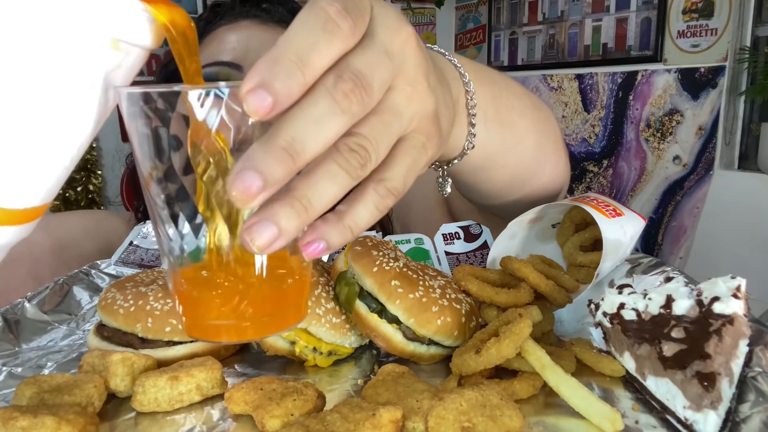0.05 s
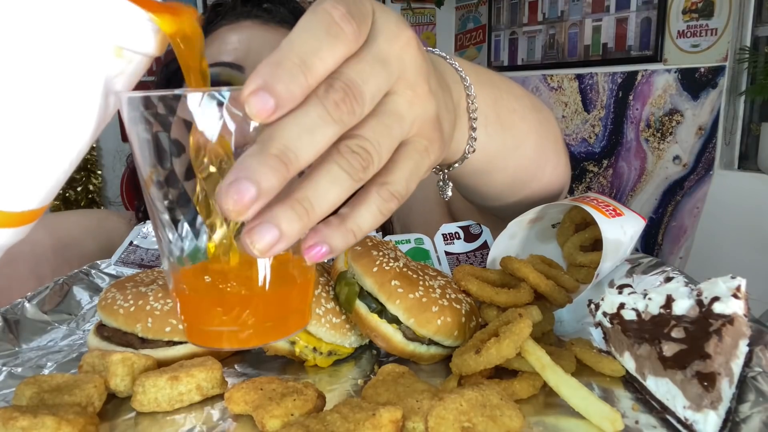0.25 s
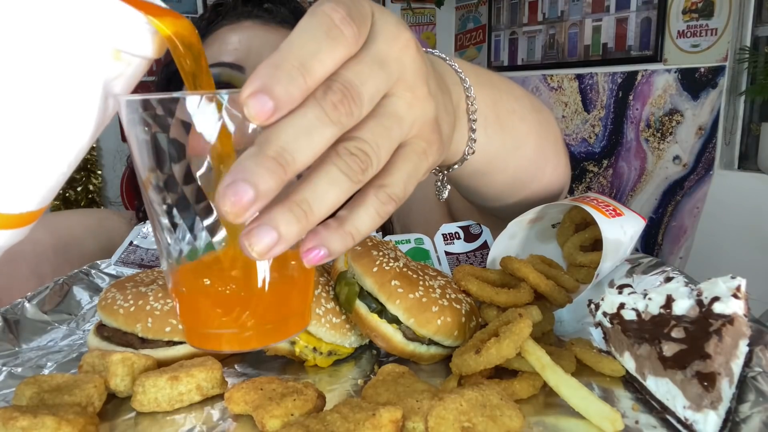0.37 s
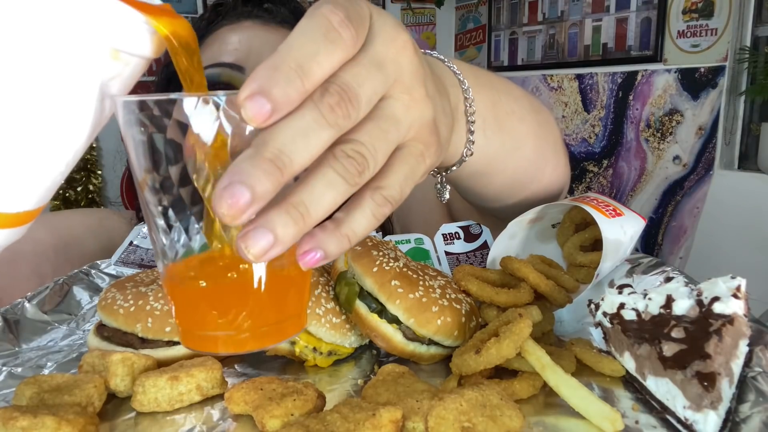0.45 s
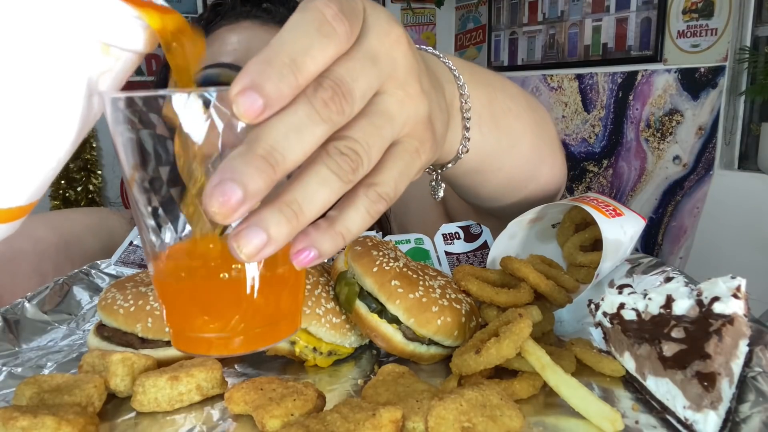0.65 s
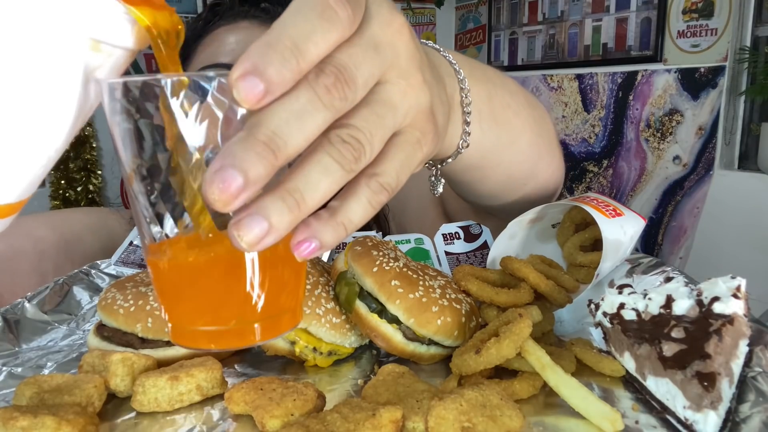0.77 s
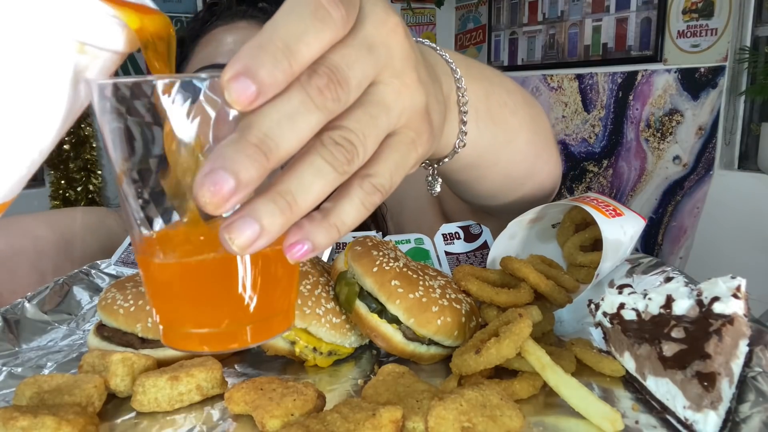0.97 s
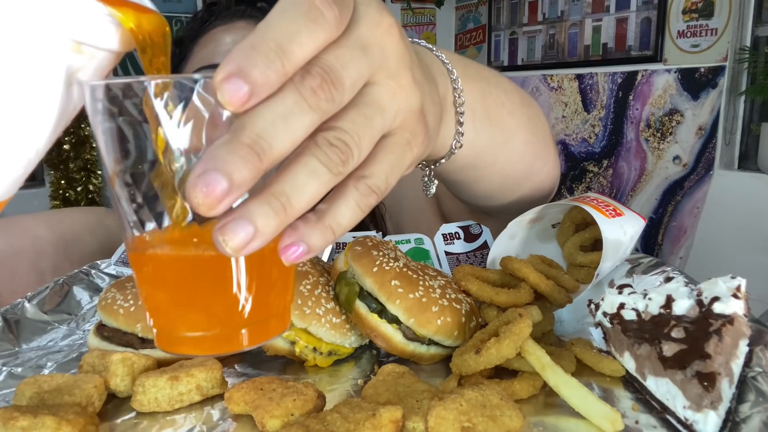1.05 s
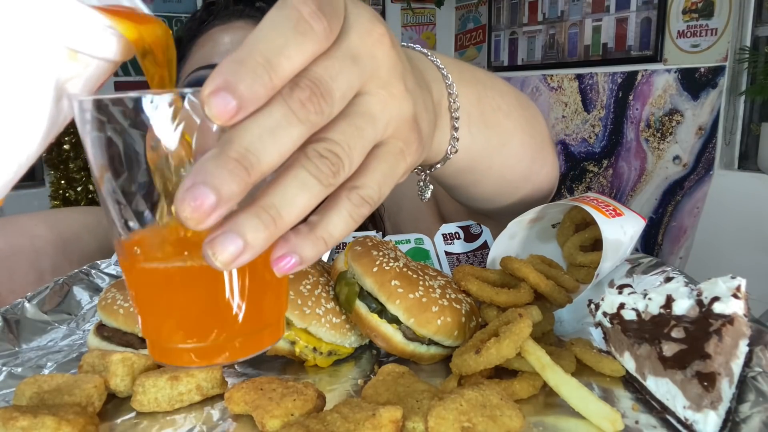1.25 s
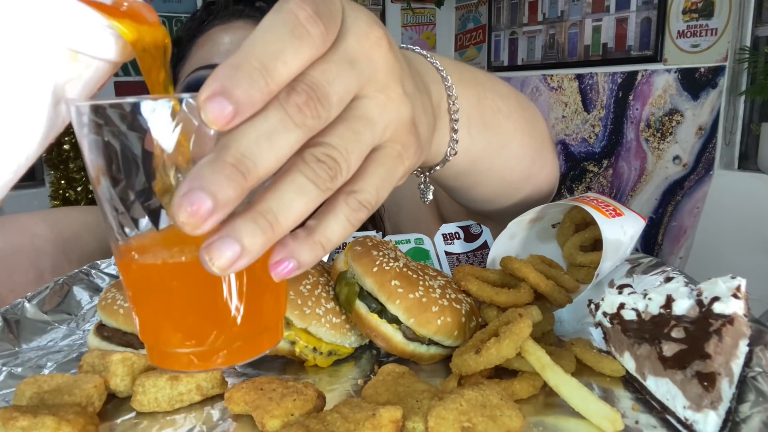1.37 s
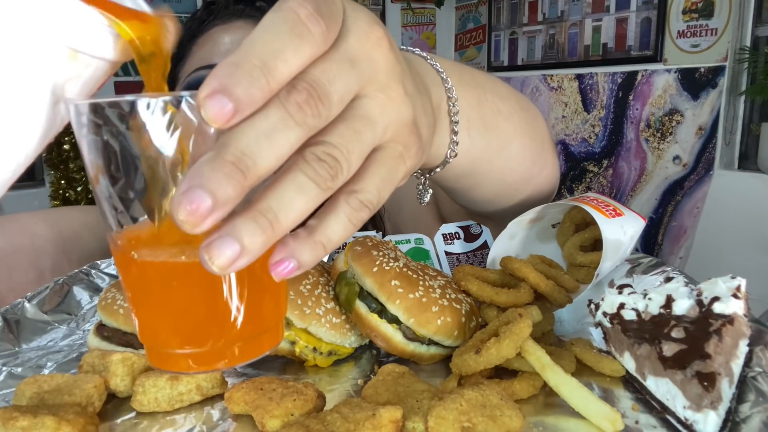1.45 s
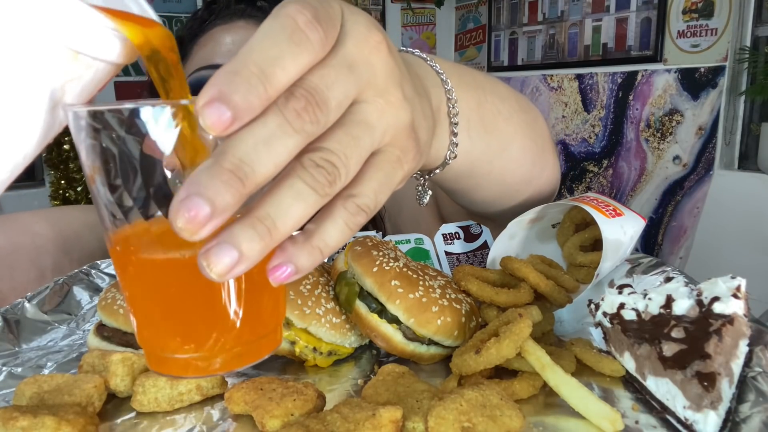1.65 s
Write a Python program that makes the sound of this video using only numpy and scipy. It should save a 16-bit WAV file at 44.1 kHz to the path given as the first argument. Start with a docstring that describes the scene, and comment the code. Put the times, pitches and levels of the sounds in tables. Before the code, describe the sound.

Close crackly fizz of a soft drink being poured into a plastic cup in a room

```python
"""A fizzy drink is poured into a plastic cup close to a phone on a table indoors.
From the start froth cracks in short bright noise pops, treble first, over a fizz of countless tiny grains.
Larger bubbles plop as rising sines; the loudest bursts of pops come near 0.3, 0.7 and 1.3 s.
Resonators ring as the air in the cup, the highest note growing later on; sparse echoes add a short tail.
A wavering hum and faint low noise rumble throughout, and the fizz sinks away at the end."""
import sys
import numpy as np
from scipy import signal
from scipy.fft import rfft, irfft, next_fast_len
from scipy.io import wavfile
from scipy.ndimage import uniform_filter1d

SR = 44100
rng = np.random.default_rng(int(sys.argv[2]) if len(sys.argv) > 2 else 0)


def transcribe(signal):
    """Save signal, clipped to [-1, 1], as a 16-bit WAV file at the path in sys.argv[1]."""
    frames = np.atleast_2d(signal).T
    limited = np.clip(frames, -1, 1)
    pcm = np.round(limited * 32767).astype(np.int16)
    wavfile.write(sys.argv[1], SR, pcm)


def boost_factor(decibels):
    """Convert a level in decibels to a linear amplitude factor."""
    exponent = np.asarray(decibels, float) / 20
    return 10 ** exponent


N = 74970  # length [samples]


def evened(x):
    """Scales a signal to an rms of 1."""
    return x / np.sqrt(np.mean(x ** 2) + 1e-20)


def smoothed(x, size):
    """Averages twice over a sliding window, leaving only slow movement."""
    return uniform_filter1d(uniform_filter1d(x, size=size), size=size)


def read(points, hz):
    """Reads a curve over frequency, interpolating along log frequency."""
    f, value = np.transpose(points)
    return np.interp(np.log(hz + 1), np.log(f + 1), value)


def along(points):
    """Draws a curve over time, one value per sample."""
    t, value = np.transpose(points)
    return np.interp(np.arange(N) / SR, t, value)


def add(mix, start_s, sound):
    """Lays a sound into the mix, cut at the end of the mix."""
    part = mix[round(start_s * SR):][:len(sound)]
    part += sound[:len(part)]


def shaped(x, gain):
    """Filters x by a function of frequency."""
    size = next_fast_len(x.shape[-1] + 4096)
    spectrum = rfft(x, size) * gain(np.fft.rfftfreq(size, 1 / SR))
    return irfft(spectrum, size)[..., :x.shape[-1]]


def pop(db, centre_hz, low_db, high_db, noise):
    """Crackle from a cluster of bubbles with its own lumpy colour; treble arrives first, lows trail."""
    # Colour that the microphone gives the pops: (frequency [Hz], gain [dB])
    mic_colour = [(250, -37), (700, -1.5), (1100, 0), (7500, 1), (9500, 7.5), (11500, 1), (14000, -6.5),
                  (16500, -28)]
    rise_s, hold_s, sag_db = 0.001, 0.0041, -6  # the sag is reached at the end of the hold and runs on
    extra_t60_s = 0.033  # after the hold, this decay joins the sag
    hump_width_oct, low_hz, high_hz, skirt_db = 0.4, 2190, 9270, -4
    lumps_db, treble_lead_s = 2 + 1, 0.0003  # lead per octave
    trim_db = -6.5
    t = np.arange(noise.shape[1]) / SR
    late = np.maximum(t - hold_s, 0)
    envelope = np.minimum(t / rise_s, 1) * boost_factor(sag_db * t / hold_s - 60 * late / extra_t60_s)
    lumps = lumps_db * evened(smoothed(noise[1], 24))

    def colour(hz):
        """A hump on a skirt between low and high sides, with a delay that grows downwards."""
        octaves = np.log2(hz + 1)
        hump = np.exp(-.5 * ((octaves - np.log2(centre_hz)) / hump_width_oct) ** 2)
        low = 1 / (1 + (hz / low_hz) ** 6)
        high = 1 / (1 + (high_hz / (hz + 1)) ** 8)
        middle = (1 - low) * (1 - high) * (hump + boost_factor(skirt_db))
        body = middle + low * boost_factor(low_db) + high * boost_factor(high_db)
        lumpy = boost_factor(read(mic_colour, hz) + np.interp(hz, np.linspace(0, SR / 2, len(t)), lumps))
        delay_s = treble_lead_s * np.clip(np.log2(SR / 2) - octaves, 0, 6)
        phase = 2 * np.pi * np.cumsum(delay_s) * hz[1]  # delay summed over frequency; hz[1] is the bin width
        return body * lumpy * np.exp(-1j * phase)

    sound = shaped(envelope * noise[0], colour)
    loudest = np.sqrt(uniform_filter1d(sound ** 2, size=130).max())  # rms of the loudest 3 ms
    return boost_factor(db + trim_db) * sound / loudest


def froth(drink):
    """Adds the cracks of the froth, each pop from fresh noise."""
    # Cracks of the froth: (time [s], level before the common trim [dB], centre [Hz],
    # low side [dB], high side [dB])
    cracks = [(0.0034, -22, 6800, -23, -5.5), (0.0646, -29, 3230, -17.5, -9),
              (0.078, -25.5, 7800, -15, -13), (0.0989, -21, 3280, -6.5, -15), (0.114, -41, 4800, -10, -23),
              (0.1368, -21.5, 2560, -9, -23), (0.182, -26, 3420, -35, -40), (0.2188, -33.5, 5000, -20, -10),
              (0.229, -17.5, 6700, -26, -4), (0.2437, -15.5, 6200, -11, -7.5),
              (0.2668, -18, 3360, -9.5, -36), (0.3014, -7, 8400, -12, -6), (0.3064, -6.5, 4500, -9.5, -33),
              (0.3325, -14.5, 4900, 10, -0.5), (0.3452, -18, 3520, -4.5, -12),
              (0.409, -19, 7200, -21, -4.5), (0.4416, -13.5, 3860, -12, -9), (0.4701, -19, 3350, -14, -41),
              (0.5438, -22.5, 3760, -45, -56), (0.5949, -22.5, 3280, 0, -9), (0.614, -21, 3800, -32, -15),
              (0.6651, -24.5, 3010, 28.5, 27.5), (0.698, -7.5, 3000, -7.5, -10),
              (0.7156, -20.5, 2580, 14, -8), (0.746, -28, 3150, -5, -12), (0.7764, -23.5, 7200, -6, -37),
              (0.7857, -23.5, 3670, 4, -16), (0.8021, -20.5, 3260, -4.5, -44), (0.846, -13, 3700, -4.5, -5),
              (0.8855, -24.5, 4220, 9.5, -15), (0.9207, -30.5, 3200, -7, -16),
              (0.9463, -26.5, 3270, -2, -33), (0.9516, -22.5, 3050, 17, -1), (0.9627, -23.5, 3220, 1, -4),
              (0.979, -31.5, 3400, -30, -41), (0.997, -17.5, 7700, -30, -5),
              (1.002, -20.5, 3800, -6.5, -40), (1.026, -22, 3240, -37, -17), (1.046, -32.5, 3840, -9, -10),
              (1.1012, -29, 3265, -7, -23), (1.1277, -21, 6300, -1.5, -0.5),
              (1.2031, -28.5, 2870, 11.5, -17), (1.2295, -26.5, 3205, -21, -19),
              (1.243, -34.5, 3100, -4, -27), (1.256, -32.5, 3050, -20, -35), (1.3092, -10, 5470, -20, -4.5),
              (1.3545, -23, 4780, 0, -21), (1.3618, -31, 3100, 10, -26), (1.379, -18, 7100, -2.5, -4),
              (1.398, -20.5, 3070, 11, -12), (1.4218, -21, 6700, -14, -17), (1.474, -31, 3180, 6, -11),
              (1.5079, -23.5, 2870, -6, -11.5), (1.5763, -27, 2800, 10, -17), (1.5991, -28, 3050, 4.5, -51),
              (1.61, -25.5, 2950, 4.5, -49), (1.649, -39, 2000, 23, -35), (1.6954, -33.5, 2884, -2, -44)]
    for (start_s, *row), noise in zip(cracks, rng.standard_normal((len(cracks), 2, 1500))):
        add(drink, start_s, pop(*row, noise))


def plop(db, hz, noise):
    """One bubble: a dying, wobbling sine that glides up; low bubbles ring longer."""
    # Bubbles near the cup's low notes ring longer: (frequency [Hz], extra T60 [s])
    long_notes = [(888, .18), (1045, .07)]
    long_width_hz, floor_t60_s, ring_cycles = 22, 0.023, 10.5
    rise_s, wobble_db, trim_db = 0.0016, 1.5, 2
    glide = 0.109  # share by which the pitch rises over the T60
    t = np.arange(len(noise)) / SR
    t60_s = floor_t60_s + ring_cycles / hz
    for note_hz, extra_s in long_notes:
        t60_s += extra_s * np.exp(-((hz - note_hz) / long_width_hz) ** 2)
    wave = np.sin(2 * np.pi * hz * (t + .5 * glide * t ** 2 / t60_s))
    wobble = wobble_db * evened(smoothed(noise, 60))
    return boost_factor(db + trim_db - 60 * t / t60_s + wobble) * (1 - np.exp(-t / rise_s)) * wave


def large_bubbles(drink):
    """Adds the plops of the larger bubbles, each with its own wobble."""
    # Plopping bubbles: (time [s], level before the common trim [dB], starting pitch [Hz])
    bubbles = [(0.1, -37, 1066), (0.3031, -12, 1480), (0.3074, -10.5, 1968), (0.309, -14.5, 3004),
               (0.322, -28.5, 918.6), (0.333, -18, 1660), (0.3345, -17, 1914), (0.357, -30.5, 656),
               (0.5752, -32, 1800), (0.571, -32, 1016), (0.596, -30.5, 1540), (0.616, -33, 635),
               (0.666, -36.5, 1050), (0.6997, -15.5, 1648), (0.702, -17, 1064), (0.717, -40, 1013),
               (0.786, -36, 1030), (0.829, -33, 930), (0.894, -25, 1008), (0.916, -23.5, 966),
               (0.917, -30.5, 585), (0.955, -26, 1390), (0.963, -32, 511), (0.9988, -33, 1730),
               (1.1704, -31.5, 1180), (1.17, -42, 895), (1.176, -33, 1463), (1.3091, -26.5, 2087),
               (1.355, -40.5, 899), (1.3976, -29.5, 874), (1.3992, -26, 1900), (1.519, -34, 1500),
               (1.528, -30.5, 511), (1.611, -34, 1138)]
    for (start_s, *row), noise in zip(bubbles, rng.standard_normal((len(bubbles), 7000))):
        add(drink, start_s, plop(*row, noise))


def fizz():
    """Thousands of tiny bubbles of uneven size, each a few cycles at its own pitch, swelling in flurries."""
    # Loudness of the fizz before the cup: (time [s], level [dB])
    fizz_level = [(0, -44), (.2, -54.5), (.8, -45), (1.2, -53.5), (1.5, -48.5), (1.7, -61.5)]
    # Balance of the fizz over pitch: (frequency [Hz], relative level [dB])
    fizz_colour = [(300, -44), (900, 11), (2520, 0.5), (4600, 3), (7600, 1.5), (9390, -18), (11100, -20.5)]
    bubbles_per_s, spread_db, grain_cycles = 6000, 3.2, 4.5
    flurries_per_s, flurry_db, flurry_t60_s = 90, 7, .025
    sizes = boost_factor(spread_db * np.minimum(rng.exponential(1, N), 4))
    hits = (rng.random(N) < bubbles_per_s / SR) * sizes
    starts = (rng.random(N) < flurries_per_s / SR) * rng.random(N) * boost_factor(flurry_db)
    hits *= 1 + signal.lfilter([1], [1, -boost_factor(-60 / flurry_t60_s / SR)], starts)
    pitches = np.geomspace(500, 15000, num=30)
    kind = rng.integers(0, len(pitches), N)
    out = np.zeros(N)
    for k, hz in enumerate(pitches):
        cycles = np.arange(0, 5 * grain_cycles, hz / SR)
        grain = cycles * np.exp(-2 * cycles / grain_cycles) * np.sin(2 * np.pi * cycles)
        grain /= np.linalg.norm(grain)
        out += boost_factor(read(fizz_colour, hz)) * np.sqrt(hz) * signal.oaconvolve(hits * (kind == k), grain)[:N]
    return boost_factor(along(fizz_level)) * evened(out)


def cup(x):
    """The air column rings along with everything in the cup: resonators added to the direct sound."""
    # Notes of the air, lowest first: (frequency [Hz], width [Hz], level [dB]); the last also follows top_level
    notes = [(902, 13, -23.5), (1050, 20, -6), (3061, 208, 2.5)]
    # The highest note grows as the cup fills, after an early dip: (time [s], added level [dB])
    top_level = [(0, 0.5), (.3, -4), (1.7, 5.5)]
    *low, top = [boost_factor(db) * signal.lfilter(*signal.iirpeak(hz, hz / width_hz, SR), x)
                 for hz, width_hz, db in notes]
    return x + sum(low) + boost_factor(along(top_level)) * top


def tail(x):
    """Sparse reflections of random sign, each band dying at its own speed; one tail shared, one per side."""
    # Decay of table and walls: (frequency [Hz], T60 [s])
    decay = [(400, 0.32), (1000, 0.23), (3500, .2), (12000, 0.17)]
    tail_db = -8
    taps = np.zeros((3, SR // 2))
    grid = np.arange(160, SR // 2 - 20, 16)
    at = grid + rng.integers(0, 16, (3, (SR // 2 - 165) // 16))
    np.put_along_axis(taps, at, rng.choice([-1., 1.], at.shape), 1)
    hz, t, z = signal.stft(taps, SR, nperseg=128)
    fading = z * boost_factor(-60 * t / read(decay, hz)[:, None])
    taps = signal.istft(fading, SR, nperseg=128)[1]
    return boost_factor(tail_db) * signal.fftconvolve(x[None], taps / np.linalg.norm(taps[0]), axes=1)[:, :N]


def rumble():
    """A hum of wavering phase, nearly alike on both sides, and faint low noise that they partly share."""
    # Spectrum of the low noise: (frequency [Hz], relative level [dB per Hz])
    noise_colour = [(41, 1), (83, 1.5), (102, -5), (146, -13.5), (500, -18), (650, -61)]
    # Loudness of the hum: (time [s], rms level [dB])
    hum_level = [(0, -49), (.07, -53.5), (.3, -62), (.44, -47), (.62, -59.5), (.72, -45.5), (.81, -55),
                 (1.35, -56.5), (1.5, -47.5), (1.6, -58.5)]
    # Pitch of the hum before its wander: (time [s], frequency [Hz])
    hum_pitch = [(0, 50.2), (.75, 55.5), (1.2, 59), (1.5, 50.4)]
    noise_db, same, wander_rad = -63.5, 0.52, 0.45  # same: correlation of the noise between the sides
    a, b, c, d = rng.standard_normal((4, N))
    both = np.array([a, same * a + np.sqrt(1 - same ** 2) * b])
    wander = wander_rad * evened(smoothed(np.array([c, d]), 3000))
    phase = 2 * np.pi * np.cumsum(along(hum_pitch)) / SR
    hum = np.sqrt(2) * boost_factor(along(hum_level)) * np.sin(phase + wander)
    return hum + boost_factor(noise_db) * evened(shaped(both, lambda hz: boost_factor(read(noise_colour, hz))))


def scene():
    """The drink reaches two microphone ports with a phase offset, plus tail and rumble."""
    # Phase offset between the ports: (frequency [Hz], lead of the left [rad])
    port_phase = [(1290, 0), (2500, -1.2), (4700, -1.6), (6460, .2), (8700, 3.05), (9900, 3.3),
                  (13800, 8.7)]
    # Part of the tail common to both sides: (frequency [Hz], share of power)
    tail_shared = [(3000, 0.17), (7000, 0.067), (9000, 0.74)]
    low, drink = rumble(), fizz()
    froth(drink)
    large_bubbles(drink)
    drink = cup(drink)
    shared, *apart = tail(drink)
    near = drink + shaped(shared, lambda hz: np.sqrt(read(tail_shared, hz)))
    ports = [shaped(near, lambda hz: np.exp(.5j * side * read(port_phase, hz))) for side in (1, -1)]
    far = shaped(np.array(apart), lambda hz: np.sqrt(1 - read(tail_shared, hz)))
    return ports + far + low


def low_pass(x):
    """Removes everything above the highest recorded frequency."""
    return signal.sosfilt(signal.butter(12, 16500, fs=SR, output="sos"), x)


def record(dry):
    """A very steep low-pass limits the band of the finished mix."""
    edge_hz = 16300
    mix = shaped(dry, lambda hz: 1 / (1 + (hz / edge_hz) ** 80))
    return low_pass(mix)


dry = scene()
out = record(dry)
transcribe(out)
```